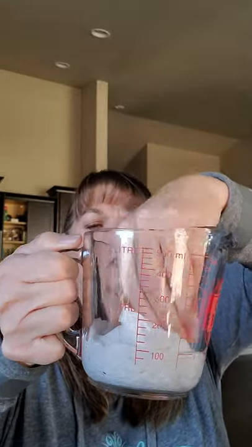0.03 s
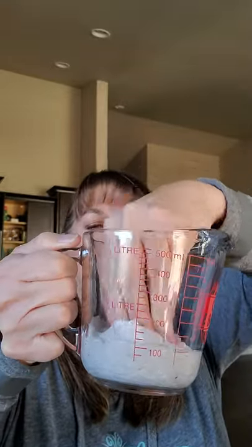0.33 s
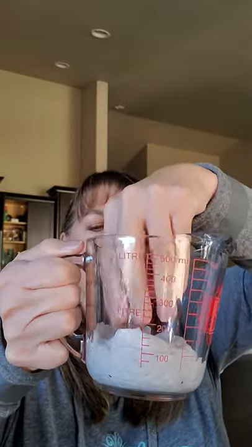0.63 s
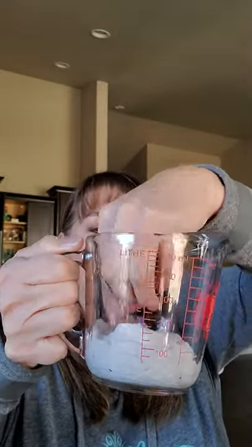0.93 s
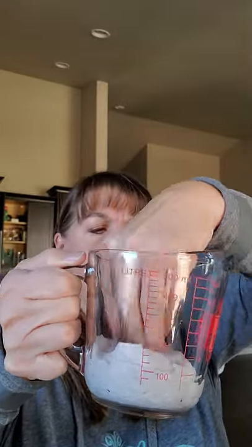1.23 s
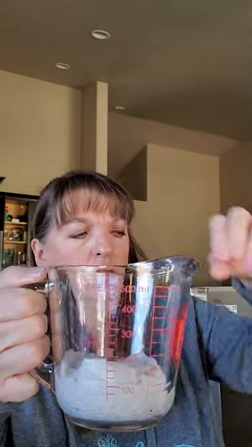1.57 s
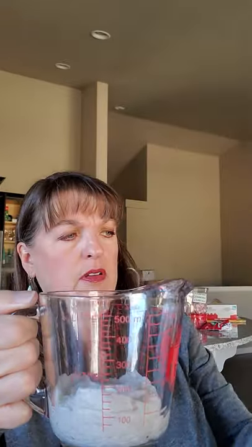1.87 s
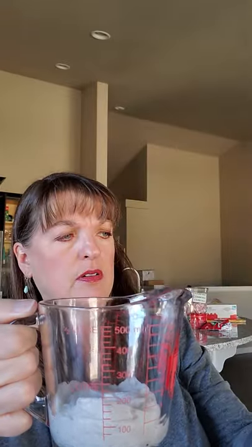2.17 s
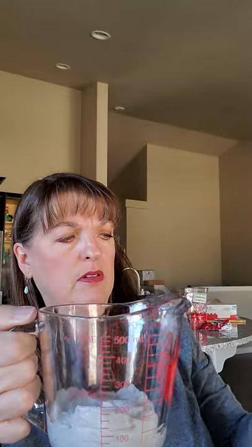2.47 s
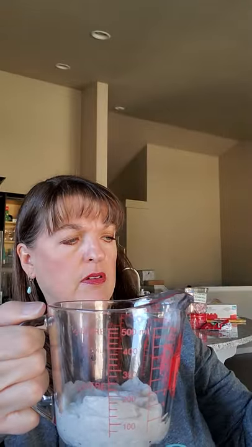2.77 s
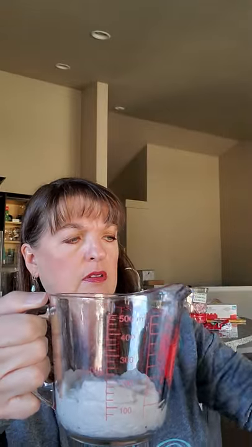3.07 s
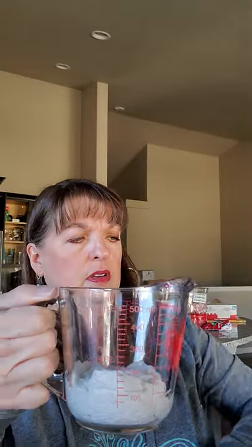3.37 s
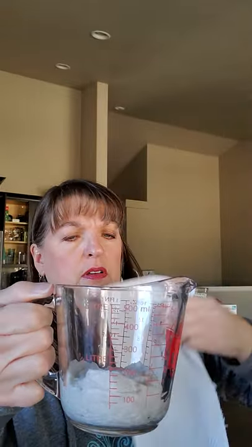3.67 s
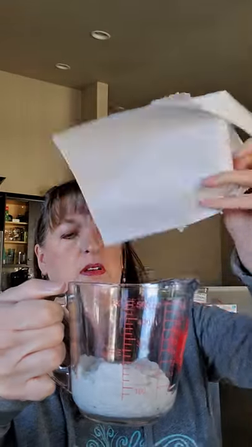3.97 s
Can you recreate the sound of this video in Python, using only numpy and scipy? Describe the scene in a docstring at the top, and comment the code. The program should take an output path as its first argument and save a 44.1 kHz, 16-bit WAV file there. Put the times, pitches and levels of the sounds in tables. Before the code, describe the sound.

A paper towel is pulled and torn off close by in a quiet kitchen with a low ventilation rumble. For the first two seconds there are only faint wet finger dabs in paste and two soft knocks on glass. From about 2.1 seconds the towel rustles off its turning roll and crinkles. It rips with a sharp snap and soft air puffs near 3.3 seconds, then rustles lightly until 4.

```python
"""A quiet kitchen: fingers dab at soft paste in a glass jug, ringing small air pockets in it.
Then a paper towel is drawn off its roll, gripped, torn off with a snap and lifted.
Paper sounds are showers of tiny fibre clicks that ring the sheet. The moving sheet pushes
puffs of air, and the room answers over a low ventilation rumble."""
import sys
import numpy as np
from scipy import signal
from scipy.fft import rfft, irfft
from scipy.io import wavfile

SR = 44100
rng = np.random.default_rng(int(sys.argv[2]) if len(sys.argv) > 2 else 0)


def to_wav(s):
    """Save 16-bit WAV."""
    ch = np.atleast_2d(s).T  # columns
    pcm = np.round(np.clip(ch, -1, 1) * 32767)  # PCM
    wavfile.write(sys.argv[1], SR, pcm.astype(np.int16))


N = 176400
TIME_S = np.arange(N) / SR
BIN_HZ = np.maximum(np.arange(N // 2 + 1) * SR / N, 1)


# Tearing force: time_s, level_db
TEAR_FORCE = [(3.215, -75), (3.233, -45), (3.242, -33.5), (3.257, -30), (3.264, -22.5), (3.274, -23),
              (3.286, -24.5), (3.295, -22.5), (3.3, -34.5), (3.36, -43), (3.41, -78.5)]
# Rip spectrum: freq_hz, gain_db
RIP_SPECTRUM = [(60, 0.5), (180, 1.5), (420, -2.5), (750, 2), (1300, 0.5), (2200, -5.5), (2800, -3),
                (4000, -6), (6400, -11), (8000, -10.5), (16000, -13.5)]
# Loose sheet spectrum: freq_hz, gain_db
SHUDDER_SPECTRUM = [(100, -19), (170, -5.5), (480, -6), (700, -2.5), (1200, -2), (1500, -8), (2000, -8.5),
                    (4000, -19), (9000, -40)]

def tearing():
    """The perforation rips across, then the freed sheet shudders."""
    time_s, level_db = np.array(TEAR_FORCE).T
    force = undb(5.5 + np.interp(TIME_S, time_s, level_db, left=-np.inf, right=-np.inf))
    rip = colour(clicks(rate_per_s=34000, spread_db=3), RIP_SPECTRUM)
    shudder = colour(clicks(rate_per_s=1800, spread_db=2), SHUDDER_SPECTRUM)
    shaking = envelope(start_s=3.275, rise_s=0.018, hold_s=0.031, release_s=0.11)
    return force * rip + undb(-27) * shaking * shudder


def whip():
    """The sheet snaps taut; its ring rises with the tension."""
    start_s, length_s, from_hz, to_hz = 3.2625, 0.00387, 650, 4630
    progress = np.clip((TIME_S - start_s) / length_s, 0, 1)
    pitch_hz = from_hz * (to_hz / from_hz) ** progress
    phase = 2 * np.pi * np.cumsum(pitch_hz * (progress > 0)) / SR
    return undb(-12) * np.sqrt(np.abs(np.sin(np.pi * progress))) * np.sin(phase)


# Sheet strokes: start_s, rise_s, hold_s, release_s, level_db, body_db, treble_db
RUSTLES = [(2.115, 0.026, .02, 0.15, -60, 11, 1), (2.179, 0.13, 0.047, 0.18, -48, -0.5, 6.5),
           (2.37, 0.08, 0.056, 0.26, -61, 9.5, 3.5), (2.651, 0.072, 0.049, 0.052, -57.5, -1, 1),
           (2.787, 0.033, 0.042, 0.045, -54, -17, 1.5), (2.866, 0.033, 0.056, 0.12, -46, 0.5, -5),
           (3.004, 0.011, 0.012, .04, -43, -18, -8), (3.036, 0.031, 0.011, 0.088, -45, 13.5, 1),
           (3.166, 0.017, 0.063, .04, -42.5, 5.5, -2.5), (3.41, .008, .008, .03, -61, -3, -10),
           (3.485, 0.019, 0.0095, 0.031, -44.5, 9, -11.5), (3.658, 0.016, 0.035, 0.17, -51.5, -0.5, -3),
           (3.701, .007, 0.0033, 0.054, -38.5, -8, -33), (3.745, 0.13, 0.033, 0.037, -49, 6, -14),
           (3.881, 0.031, 0.032, 0.065, -47, -3.5, -5.5), (3.953, 0.073, .03, .08, -49.5, 3, -7)]
# Sliding paper spectrum: freq_hz, gain_db
PAPER_SPECTRUM = [(150, 10), (400, 4), (1000, 5.5), (1800, -1), (2450, -1), (3200, 0.5), (4300, -0.5),
                  (7000, -1.5), (15000, -3)]

def rustling():
    """Fibres catch and slip as the sheet slides and bends."""
    catch_per_s, catch_db, body_hz, treble_hz = 70, 1.6, 1620, 6500
    sliding = colour(clicks(rate_per_s=6500, spread_db=2), PAPER_SPECTRUM)
    steps = rng.standard_normal(int(N / SR * catch_per_s) + 2)
    catching = np.interp(TIME_S * catch_per_s, np.arange(len(steps)), steps)
    paper = unit(undb(catch_db * catching) * sliding)
    body_shelf = 1 / (1 + (BIN_HZ / body_hz) ** 4)
    treble_shelf = 1 / (1 + (treble_hz / BIN_HZ) ** 4)
    sheet = np.zeros((2, N))
    for start_s, rise_s, hold_s, release_s, level_db, body_db, treble_db in RUSTLES:
        stroke = shape(paper, undb(body_db * body_shelf + treble_db * treble_shelf))
        sheet += undb(level_db) * envelope(start_s, rise_s, hold_s, release_s) * stroke
    return sheet


# Roll resonances: start_s, hold_s, ring_hz, width_hz, level_db
ROLL_RUBS = [(2.195, .05, 1780, 480, -48.5), (2.235, .1, 1040, 400, -49), (2.25, .08, 3200, 400, -50),
             (2.21, .12, 4400, 1400, -52)]

def roll():
    """The turning roll rubs and rings."""
    rubbing = clicks(rate_per_s=6500, spread_db=2)
    return sum(undb(level_db) * envelope(start_s, rise_s=0.03, hold_s=hold_s, release_s=0.06)
               * ring(rubbing, ring_hz, width_hz)
               for start_s, hold_s, ring_hz, width_hz, level_db in ROLL_RUBS)


# Crease cracks: start_s, level_db, centre_hz, width_hz, decay_s
POPS = [(2.904, -42.5, 1260, 900, 0.0022), (2.9462, -36.5, 11600, 7000, 0.0018),
        (3.029, -48.5, 5330, 1800, 0.0028), (3.082, -35, 1360, 1500, 0.0048),
        (3.264, -13.5, 4970, 14000, 0.0028), (3.2853, -17.5, 9900, 12000, 0.0012),
        (3.423, -42.5, 11000, 9000, 0.0054), (3.4929, -37.5, 6500, 7000, 0.0037)]

def pops():
    """Single creases and perforations crack."""
    crack = noise()
    return sum(undb(level_db) * (TIME_S >= start_s) * np.exp(-np.abs(TIME_S - start_s) / decay_s)
               * ring(crack, centre_hz, width_hz)
               for start_s, level_db, centre_hz, width_hz, decay_s in POPS)


# Air puffs: start_s, rise_s, release_s, level_db
PUFFS = [(3.05, 0.013, 0.028, -26.5), (3.227, 0.037, 0.045, -23), (3.331, .035, 0.066, -27.5),
         (3.41, 0.014, 0.068, -38)]
# Puff spectrum: freq_hz, gain_db
PUFF_SPECTRUM = [(26, -37), (48, 8.5), (70, 2), (130, -5.5), (250, -9.5), (500, -26), (1500, -63)]

def puffs():
    """The moving sheet pushes low thumps of air."""
    air = colour(noise(), PUFF_SPECTRUM)
    return air * sum(undb(level_db) * envelope(start_s, rise_s, 0, release_s)
                     for start_s, rise_s, release_s, level_db in PUFFS)


# Finger dabs: start_s, rise_s, release_s, level_db, pocket_hz, pocket_db
DABS = [(0.271, 0.036, 0.066, -60.5, 1890, -9.5), (.555, 0.028, 0.096, -74, 3740, -5),
        (.717, 0.0051, 0.097, -66.5, 6400, -7), (1.052, 0.014, 0.078, -68.5, 4960, 0.5),
        (1.629, 0.0046, .02, -73, 4000, -8), (2.01, 0.021, 0.14, -82, 5540, 5.5)]
# Dab spectrum, with the glass jug's modes: freq_hz, gain_db
JUG_SPECTRUM = [(300, -17), (850, 6), (1400, -11), (2100, 1), (2700, 7), (4500, -2), (7000, -2.5),
                (15000, -5)]

def dabs():
    """Wet crackles under the fingers ring the glass jug and small air pockets in the paste."""
    crackle = clicks(rate_per_s=2000, spread_db=1.5)
    wet = colour(crackle, JUG_SPECTRUM)
    paste = np.zeros((2, N))
    for start_s, rise_s, release_s, level_db, pocket_hz, pocket_db in DABS:
        pocket = undb(pocket_db) * ring(crackle, pocket_hz, width_hz=0.19 * pocket_hz)
        paste += undb(level_db) * envelope(start_s, rise_s, 0, release_s) * (wet + pocket)
    return paste


# Jug knocks: start_s, level_db
KNOCKS = [(0.297, -53.5), (1.075, -58)]

def knocks():
    """Fingers knock dully on the glass jug."""
    jug = ring(noise(), centre_hz=793, width_hz=120)
    return jug * sum(undb(level_db) * envelope(start_s, rise_s=0.005, hold_s=0, release_s=0.054)
                     for start_s, level_db in KNOCKS)


def room(direct):
    """Diffuse kitchen echoes; the treble dies sooner."""
    low_t60_s, treble_t60_s, crossover_hz, delay_s = 0.52, 0.35, 6500, 0.011
    echoes = noise()
    low = shape(echoes, 1 / (1 + (BIN_HZ / crossover_hz) ** 4))
    tail = low * undb(-60 * TIME_S / low_t60_s) + (echoes - low) * undb(-60 * TIME_S / treble_t60_s)
    response = unit(tail * (TIME_S > delay_s)) / np.sqrt(N)
    return undb(-11) * signal.fftconvolve(direct, response, axes=1)[:, :N]


# Ventilation spectrum: freq_hz, gain_db
RUMBLE_SPECTRUM = [(20, -25), (40, -14), (55, -16), (85, -2.5), (135, -5), (215, 0.5), (245, -9),
                   (272, -0.5), (305, -11.5), (390, -11.5), (520, -17.5), (680, -17), (900, -28.5),
                   (1250, -39), (2400, -66.5)]
# Ventilation tones: pitch_hz, level_db
HUM_TONES = [(120, -63.5), (160, -58.5), (642, -65.5)]
# Hiss spectrum: freq_hz, gain_db
HISS_SPECTRUM = [(800, -15), (1500, 5.5), (2300, -0.5), (3800, 1.5), (5600, -4.5), (6700, 1), (7500, -10),
                 (15500, -4)]

def background():
    """Steady ventilation rumble with wavering tones, and a faint hiss."""
    top_hz = RUMBLE_SPECTRUM[-1][0]
    rumble = unit(shape(noise(), undb(curve(RUMBLE_SPECTRUM)) * (BIN_HZ < top_hz)))
    air = noise()
    hum = sum(undb(level_db) * ring(air, pitch_hz, width_hz=7) for pitch_hz, level_db in HUM_TONES)
    hiss = colour(noise(), HISS_SPECTRUM)
    return undb(-47.5) * rumble + hum + undb(-77.5) * hiss


def clicks(rate_per_s, spread_db, ring_s=0.00056):
    """A shower of tiny clicks, mostly weak, each ringing briefly."""
    hits = rng.random(N) < rate_per_s / SR
    strength = hits * undb(spread_db * np.minimum(rng.exponential(size=N), 5))
    energy = signal.lfilter([1], [1, -np.exp(-2 / (ring_s * SR))], strength ** 2)
    return unit(noise(np.sqrt(energy)))


# Left-right likeness: freq_hz, correlation
CORRELATION = [(60, 0.92), (130, 0.99), (290, 0.88), (640, 0.75), (1400, 0.12), (3000, -0.26),
               (15000, 0.14)]

def noise(amplitude=1):
    """Stereo white noise, alike on both sides in the bass."""
    white = amplitude * rng.standard_normal((2, N))
    correlation = np.clip(curve(CORRELATION), -0.99, 0.99)
    mid = shape(white[0], np.sqrt((1 + correlation) / 2))
    side = shape(white[1], np.sqrt((1 - correlation) / 2))
    return np.array([mid + side, mid - side])


def envelope(start_s, rise_s, hold_s, release_s):
    """Linear rise, hold, then a fall of 20 dB per release_s."""
    age_s = TIME_S - start_s
    return np.clip(age_s / rise_s, 0, 1) * 10 ** (-np.maximum(age_s - rise_s - hold_s, 0) / release_s)


def ring(x, centre_hz, width_hz):
    """One steep-sided resonance, at rms 1."""
    detuning = (BIN_HZ ** 2 - centre_hz ** 2) / (BIN_HZ * width_hz * 1.48)
    return unit(shape(x, 1 / (1 + detuning ** 2)))


def colour(x, spectrum):
    """Filter by (freq_hz, gain_db) points, at rms 1."""
    return unit(shape(x, undb(curve(spectrum))))


def shape(x, gain):
    """Filter by a gain per bin."""
    return irfft(rfft(x) * gain, N)


def curve(points):
    """Join (freq_hz, value) points on a log axis."""
    freq_hz, value = np.array(sorted(points), float).T
    return np.interp(np.log(BIN_HZ), np.log(freq_hz), value)


def undb(db):
    """Decibels to gain."""
    return 10 ** (np.asarray(db) / 20)


def unit(x):
    """Scale to rms 1."""
    return x / np.sqrt(np.mean(x ** 2))


# Towel position: time_s, left_minus_right_db
TOWEL_PAN = [(2.28, -3), (2.45, 2), (2.9, 2), (3.261, -1), (3.9, -1)]

def scene():
    """Paper and hands close by, the room around them."""
    pan_db = np.interp(TIME_S, *np.array(TOWEL_PAN).T) / 2
    towel = rustling() + roll() + tearing() + whip() + pops()
    fingers = dabs() + knocks()
    return towel * undb([pan_db, -pan_db]) + fingers + room(towel + fingers) + puffs() + background()


# Microphone response: freq_hz, gain_db
MIC_RESPONSE = [(5500, -0.5), (6500, 2.5), (7000, 0.5), (7500, -4.5), (9100, 1), (10400, -2), (14000, 3),
                (16000, -1.5)]
# Microphone balance: freq_hz, left_minus_right_db
MIC_BALANCE = [(60, -0.5), (200, 0), (600, 4.5), (1300, 2), (2400, 3.5), (4400, 10), (6600, 9), (8000, 3.5),
               (15000, 4)]

def record(dry):
    """The microphones colour the treble, the left hears more of it; the top is cut."""
    cutoff_hz = 15950
    tilt_db = curve(MIC_BALANCE) / 2
    heard = shape(dry, undb(curve(MIC_RESPONSE) + np.array([tilt_db, -tilt_db])))
    lowpass = signal.ellip(10, 0.2, 70, cutoff_hz, fs=SR, output="sos")
    return signal.sosfilt(lowpass, np.clip(heard, -1, 1))


dry = scene()
out = record(dry)
to_wav(out)
```